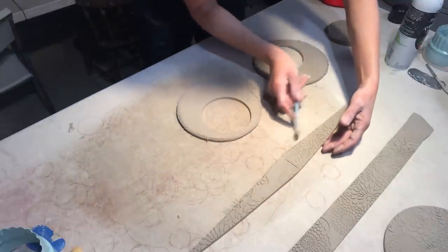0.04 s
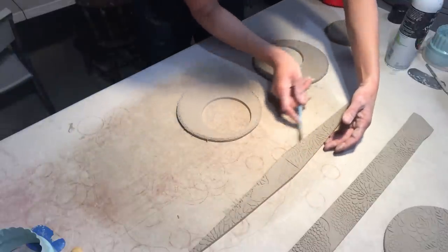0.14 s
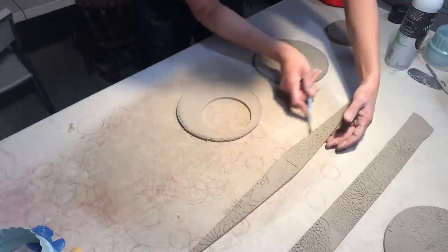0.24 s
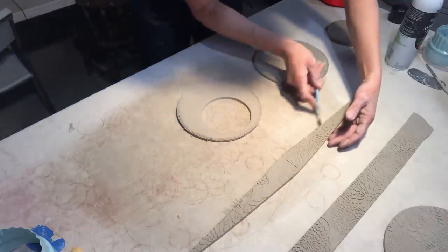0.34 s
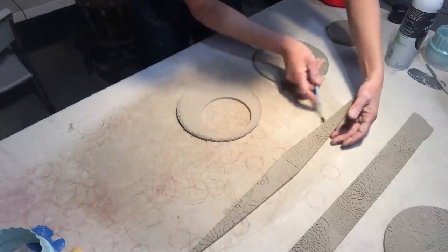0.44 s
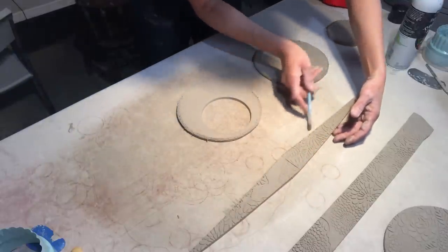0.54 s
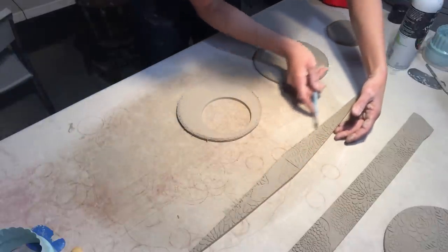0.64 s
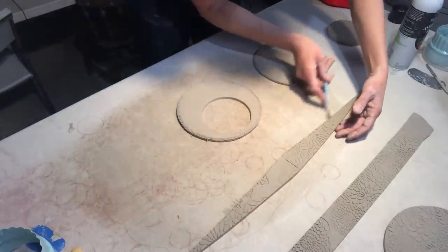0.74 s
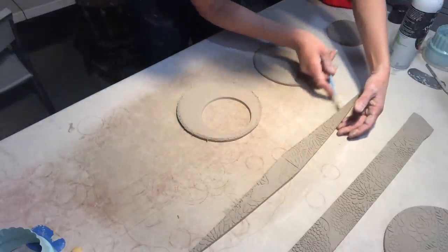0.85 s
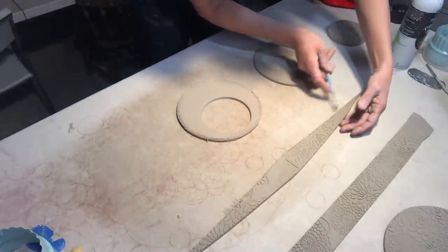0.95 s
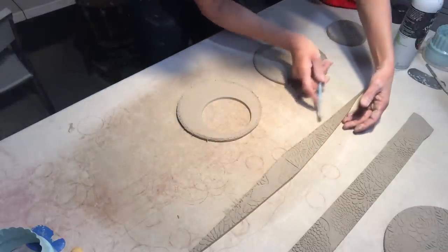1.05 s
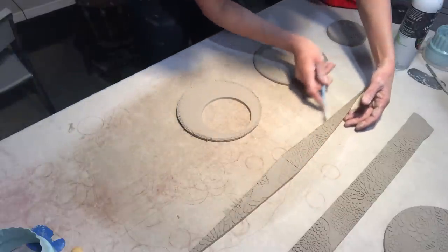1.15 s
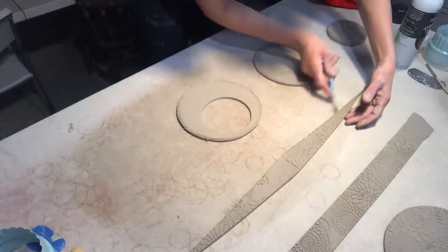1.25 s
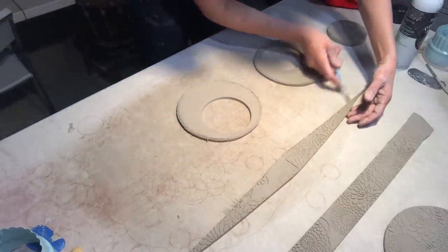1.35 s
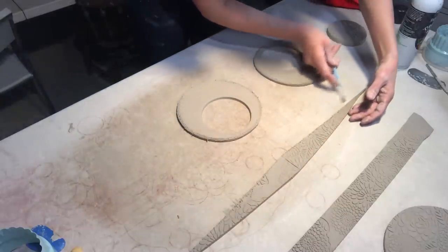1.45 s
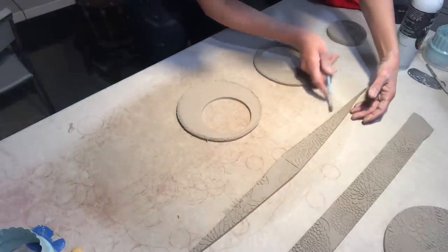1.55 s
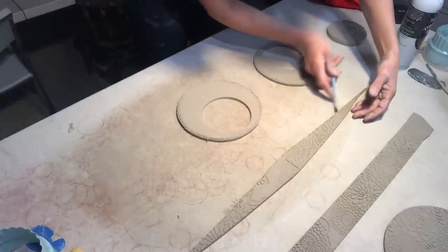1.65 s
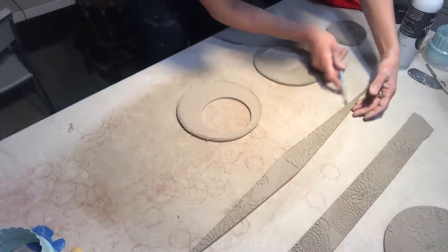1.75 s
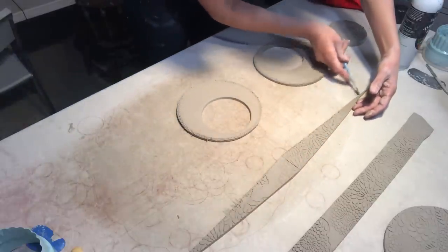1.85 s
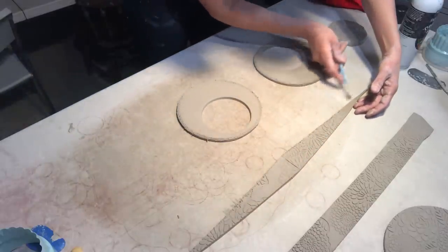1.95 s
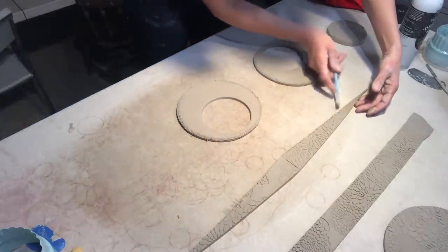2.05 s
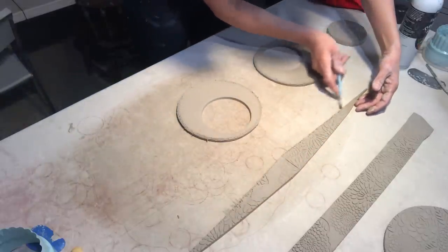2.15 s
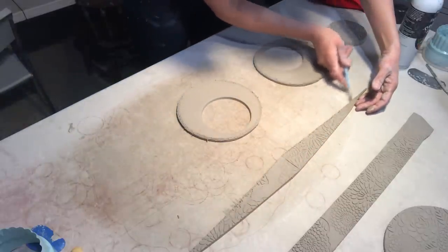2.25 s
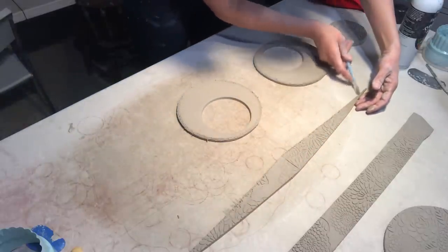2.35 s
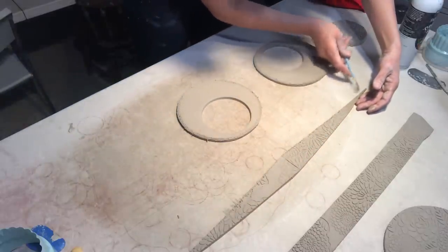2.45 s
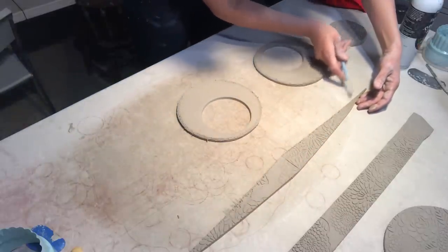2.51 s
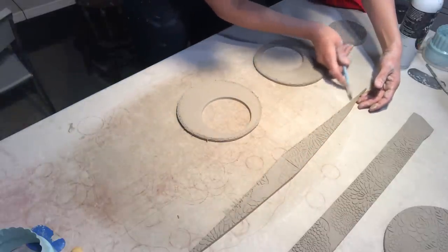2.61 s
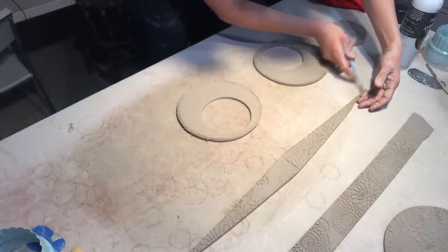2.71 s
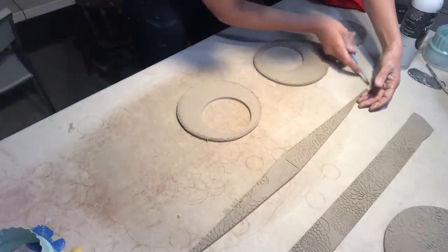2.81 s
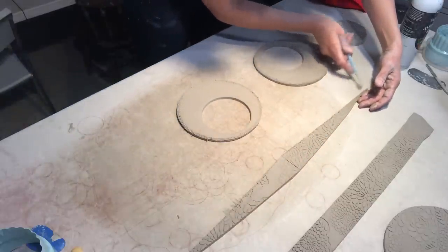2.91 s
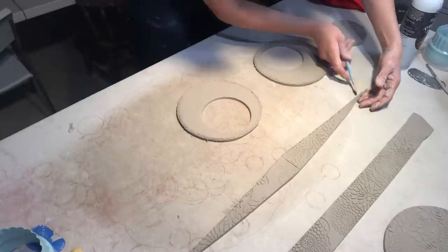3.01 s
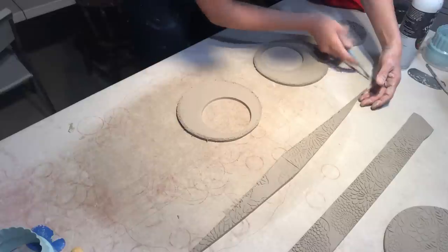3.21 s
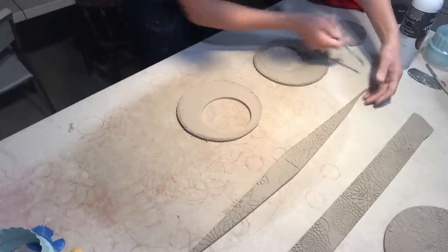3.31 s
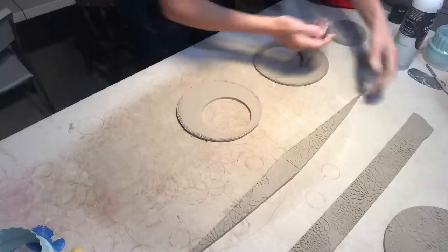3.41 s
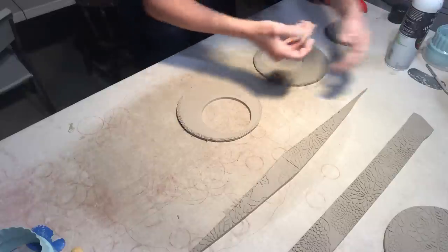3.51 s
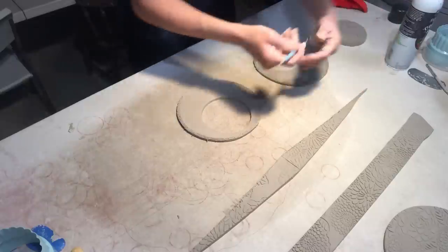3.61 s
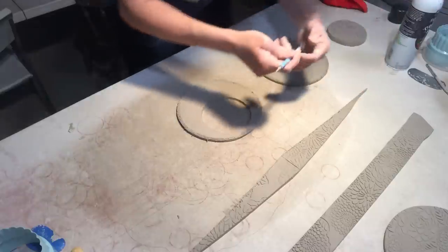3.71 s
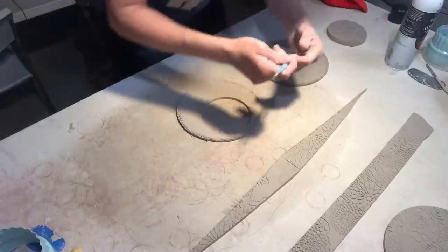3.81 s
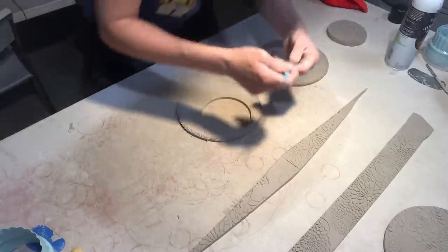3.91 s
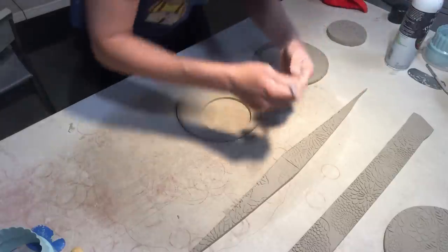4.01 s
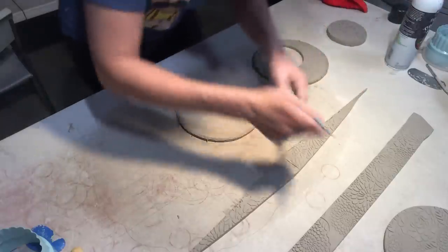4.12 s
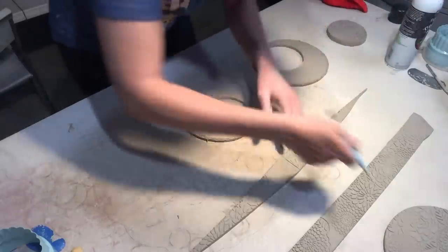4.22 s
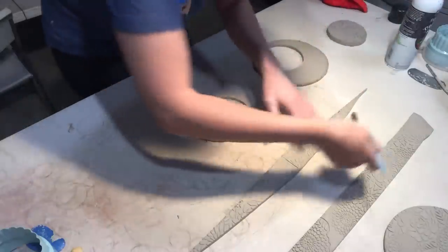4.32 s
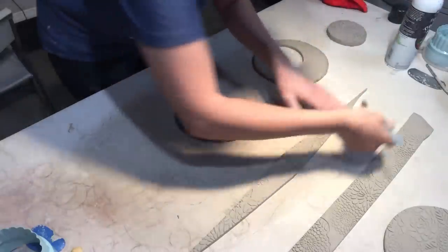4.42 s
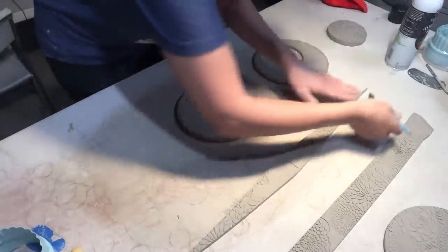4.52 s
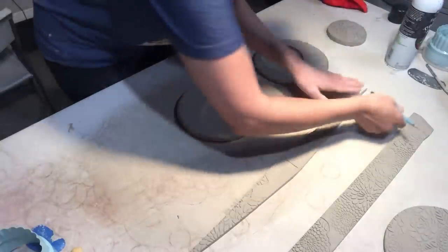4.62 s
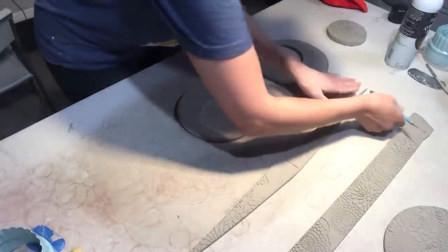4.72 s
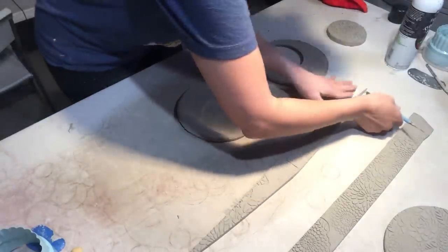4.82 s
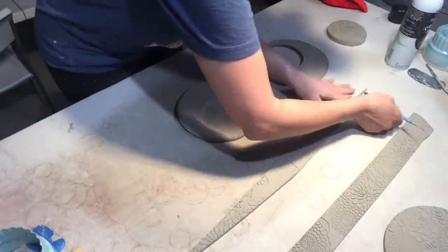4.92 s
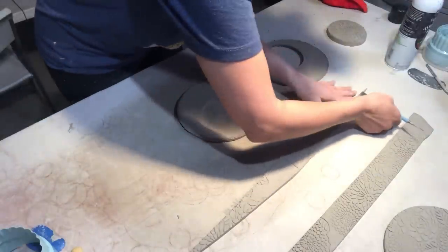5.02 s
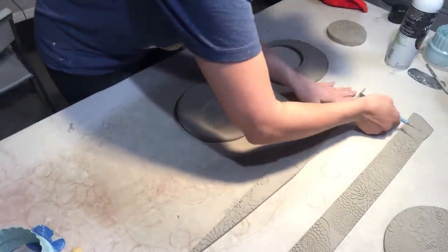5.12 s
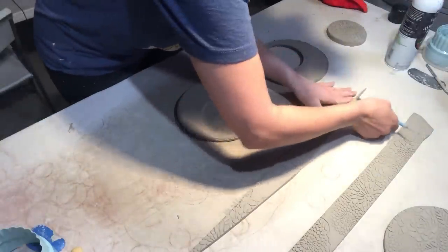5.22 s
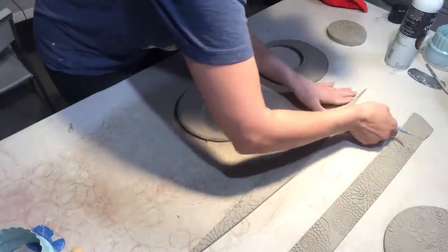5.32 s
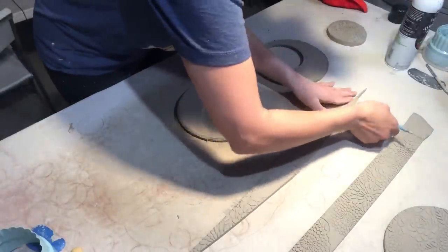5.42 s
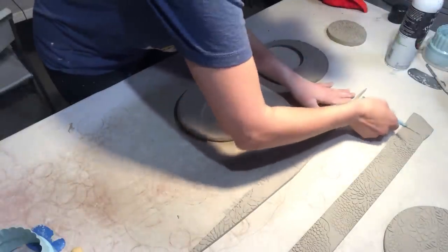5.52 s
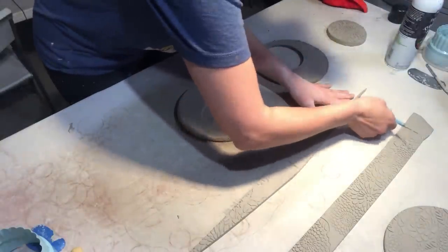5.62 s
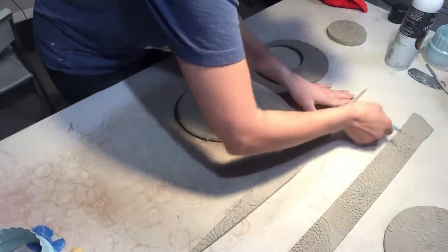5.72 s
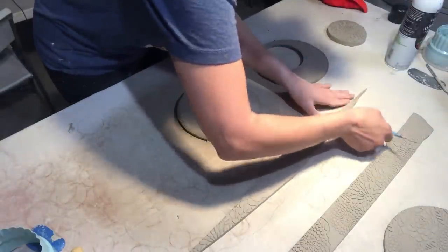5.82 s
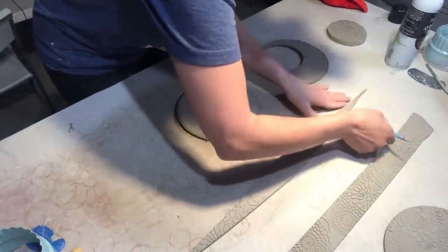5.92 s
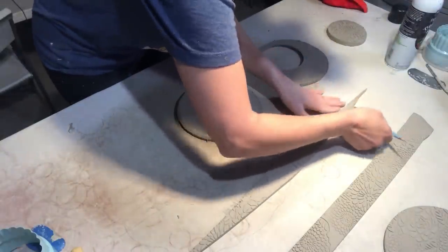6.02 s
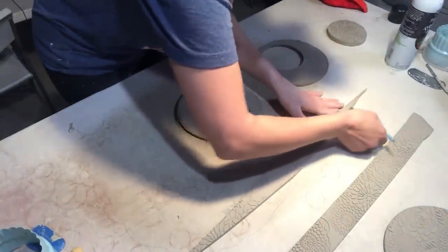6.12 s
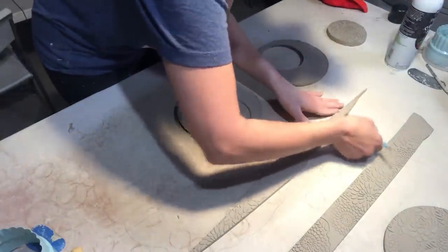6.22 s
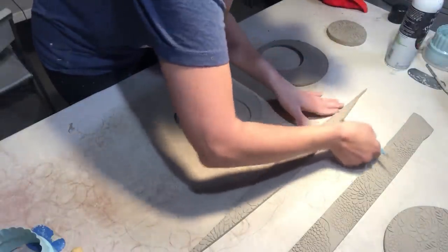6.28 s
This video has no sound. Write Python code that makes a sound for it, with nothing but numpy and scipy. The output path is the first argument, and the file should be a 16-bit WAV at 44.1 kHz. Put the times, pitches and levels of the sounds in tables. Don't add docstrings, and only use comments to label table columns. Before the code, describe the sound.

A toothed metal tool scrapes gritty strokes across clay on a table, each starting with a light knock, pausing midway, then resuming.

```python
import sys
import numpy as np
from scipy import signal
from scipy.fft import rfft, irfft
from scipy.io import wavfile

SR = 44100
rng = np.random.default_rng(int(sys.argv[2]) if len(sys.argv) > 2 else 0)


def linear_from_db(decibels):
    return 10 ** (np.asarray(decibels, float) / 20)


def persist_wave(psi):
    counts = np.round(np.clip(psi, -1, 1) * 32767).astype(np.int16)
    wavfile.write(sys.argv[1], SR, np.atleast_2d(counts).T)


N = 280035


def at_hz(points, hz):
    table_hz, values = np.array(points).T
    return np.interp(np.log(hz + 1), np.log(table_hz), values)


def bumps(modes, hz):
    return sum(db / (1 + (2 * (hz - centre_hz) / width_hz) ** 2) for centre_hz, width_hz, db in modes)


def coloured(x, db_at):
    size = 8192
    hz = np.arange(size // 2 + 1) * SR / size
    cepstrum = irfft(db_at(hz) * np.log(10) / 20)
    cepstrum[1:size // 2] *= 2
    cepstrum[size // 2 + 1:] = 0
    response = irfft(np.exp(rfft(cepstrum)))
    return signal.fftconvolve(x, response)[:N]


def band(x, low_hz, high_hz):
    return signal.sosfilt(signal.butter(2, [low_hz, high_hz], "band", fs=SR, output="sos"), x)


def band_one(x, low_hz, high_hz):
    return x / np.std(band(x, low_hz, high_hz))


def drift(rate):
    step, warm_up = 40, 2000
    r = np.exp(-2 * np.pi * rate * step / SR)
    noise = rng.standard_normal(N // step + 2 + warm_up)
    slow = signal.lfilter([1], [1, -2 * r, r * r], noise)[warm_up:]
    return np.interp(np.arange(N) / step, np.arange(len(slow)), slow / np.std(slow))


def resonance(x, hz, width_hz):
    r = np.exp(-np.pi * width_hz / SR)
    push = np.array([1, 0, -1]) * (1 - r * r) / 2
    return signal.lfilter(push, [1, -2 * r * np.cos(2 * np.pi * hz / SR), r * r], x)


# (frequency [Hz], level [dB per Hz])
SLAB_COLOUR = [(100, -25), (200, -11.5), (450, -1.5), (700, -0.5), (1100, -4.5), (2000, -4.5), (4000, -4.5),
               (5500, -8.5), (7300, -20), (8300, -28), (10000, -29), (12500, -29), (14000, -23.5),
               (16000, -40)]
# (frequency [Hz], width [Hz], boost [dB])
TABLE_MODES = [(222.7, 13.3, 5), (365, 46, 5.5), (530, 38, 4), (804, 36, 7.5), (1010, 167, 6.5),
               (1280, 270, 3.5), (1517, 80, -11)]
# (frequency [Hz], width [Hz], first grip level [dB], second grip level [dB])
SHANK_MODES = [(1764, 123, -2, 4.5), (2073, 163, 3, 1.5), (2410, 225, 0, 3.5), (3136, 86, 3.5, -2.5),
               (4300, 254, -1.5, -11), (4950, 69, 2, -6), (5560, 110, -2.5, 0), (5800, 77, -17, -7),
               (6805, 87, 1, -3)]
# (frequency [Hz], width [Hz], first grip level [dB], second grip level [dB])
TOOTH_MODES = [(10400, 100, 3, 4), (13160, 80, 16, 6), (13850, 220, 6, 5), (15600, 150, -1, -2)]
# (frequency [Hz], width [Hz], first grip level [dB], second grip level [dB])
FREE_STEEL_MODES = [(8730, 66, -22.5, -23), (11150, 90, -29, -31.5)]


def drag():
    level, hiss_db, rumble_db, ring_db = hand()
    level = level * linear_from_db(2.0 * drift(50))

    def colour(hz):
        return at_hz(SLAB_COLOUR, hz) + bumps(TABLE_MODES, hz)

    rasp = band_one(coloured(slips(per_s=6000, spread_db=3.6), colour), 717, 3680)
    rumble = band(rasp, 150, 505) * linear_from_db(rumble_db + 5.5)
    patches = mottled(rasp, patchy_db=1.7)
    middle = sum(patches[:12])
    hiss = band_one(sum(patches[12:]), 11500, 15500) * linear_from_db(hiss_db - 6)
    rubbing = level * slips(per_s=7000, spread_db=3.0)
    shank = steel(rubbing * linear_from_db(-1.43), SHANK_MODES)
    free_ring = steel(rubbing * linear_from_db(ring_db + 41), FREE_STEEL_MODES)
    whistle = steel(rubbing * linear_from_db(hiss_db), TOOTH_MODES)
    return level * (rumble + linear_from_db(-0.5) * middle + hiss) + shank + free_ring + whistle


# (time of full pressure [s], length [s],
# slab and table level [dB], steel hiss relative level [dB], light-grip ring relative level [dB])
PUSHES = [(0.0, 0.0072, -58.5, -24, -35), (0.208, 0.038, -45, -18, -19), (0.276, 0.12, -44, -20.5, -31),
          (0.389, 0.068, -45.5, -24, -28), (0.705, 0.074, -40, -22, -26), (0.793, 0.031, -50.5, -21, -16),
          (0.887, 0.075, -46.5, -25, -21.5), (1.198, .11, -43, -21, -27), (1.325, 0.14, -40, -25, -24),
          (1.696, 0.05, -44, -22, -29), (1.789, 0.15, -41, -22.5, -26), (2.206, 0.098, -45.5, -26, -30),
          (2.307, 0.082, -41.5, -23, -38), (2.409, 0.073, -45, -25, -36), (2.698, .18, -43.5, -24, -28),
          (3.147, 0.063, -46, -22, -29), (5.234, 0.049, -50.5, -21, -30), (5.311, 0.056, -50, -22, -20.5),
          (5.627, 0.01, -57.5, -18, -26), (5.692, 0.031, -45.5, -21, -29), (5.758, .08, -54, -16, -19),
          (5.853, 0.057, -43.5, -17, -27), (6.154, 0.07, -55, -24, -25), (6.256, 0.07, -47, -15, -28)]


def hand():
    bite, sag, lift = 800, 1, 484
    hiss_clog, grip_ease = 20, 40
    firm_db, rumble_db, rumble_lag = -45, -3.5, 0.34
    t = np.arange(0, N + 64, 32) / SR
    s, length, db, hiss_db, ring_db = np.transpose(PUSHES)[:, :, None]
    age = t - s
    along = np.clip(age, 0, length) - length / 2
    coming_db = bite * np.maximum(-age, 0)
    going_db = lift * np.maximum(age - length, 0)
    pressure_db = db - coming_db - sag * along - going_db
    power = linear_from_db(np.maximum(2 * pressure_db, -400)) + 1e-30
    level_db = 10 * np.log10(power.sum(axis=0))
    share = power / power.sum(axis=0)
    hiss = (share * (hiss_db - hiss_clog * along)).sum(axis=0)
    ring = (share * (ring_db + grip_ease * along)).sum(axis=0)
    rumble = rumble_db + rumble_lag * np.clip(firm_db - level_db, -10, 20)
    controls = (linear_from_db(level_db), hiss, rumble, ring)
    return [np.interp(np.arange(N) / SR, t, control) for control in controls]


def slips(per_s, spread_db):
    strength_db = spread_db * np.minimum(rng.exponential(1, N), 5)
    sizes = linear_from_db(strength_db) * rng.choice([-1, 1], N)
    clicks = sizes * (rng.random(N) < per_s / SR)
    return clicks / np.std(clicks)


def mottled(x, patchy_db):
    edges_hz = 600 * 2 ** np.arange(0, 4.9, .3)
    return [band(x, low, high) * linear_from_db(patchy_db * drift(18.7)) for low, high in zip(edges_hz, edges_hz[1:])]


def steel(force, modes):
    grip_change_s = 4.0
    second = np.arange(N) / SR > grip_change_s
    ringing = 0
    for hz, width_hz, early_db, late_db in modes:
        grip_db = np.where(second, late_db, early_db) + 4.5 * drift(13.3)
        ringing = ringing + resonance(force * linear_from_db(grip_db), hz, width_hz)
    return ringing


# (time [s], peak level [dB], brightness relative level [dB], thud relative level [dB])
LANDINGS = [(0.161, -26.5, -19, -13), (0.647, -34.5, -16, -11), (1.171, -24.5, -14, -14),
            (1.652, -28.5, -12, -15), (2.173, -24.5, -14.5, -14.5), (2.659, -23, -16, -18),
            (3.094, -30.5, -13.5, -12), (3.419, -60, -20, -16), (5.064, -32.5, -29, -13),
            (5.223, -46.5, -12, -10), (5.572, -49.5, -21, -5.5), (5.596, -54, -4, -18),
            (5.633, -51.5, -13, -8), (5.774, -48, -16, -4), (6.117, -30, -15.5, -14)]
# (frequency [Hz], level [dB per Hz])
KNOCK_COLOUR = [(100, -32), (300, 2.5), (1000, -0.5), (1600, -6), (2600, -3), (4000, -6.5), (4800, -12.5),
                (5600, -11.5), (7500, -17), (8400, -24), (10000, -30), (16000, -40)]
# (frequency [Hz], width [Hz], boost [dB])
BLOW_MODES = [(2600, 700, 3), (5600, 500, 7), (7200, 900, 3)]
# (frequency [Hz], width [Hz], level [dB])
THUD_MODES = [(193.3, 54, 0.5), (321, 19, 3.5), (451, 35, -3)]


def landings():
    body, bright, thud = np.zeros((3, N))
    age = np.arange(round(.03 * SR)) / SR
    touch = (1 - np.exp(-age / 0.00041)) * np.exp(-age / 0.005)
    rebound = .5 * (age > .009) * np.exp(-np.abs(age - .009) / .003)
    shape = touch + rebound
    for s, db, bright_db, thud_db in LANDINGS:
        teeth = linear_from_db(db) * shape * np.tanh(rng.standard_normal(len(age)))
        start = round(s * SR)
        at = slice(start, start + len(age))
        body[at] = teeth
        bright[at] = teeth * linear_from_db(bright_db + 13.5)
        thud[at] = linear_from_db(db + thud_db) * shape
    force = band(body, 297, 22000) + band(bright - body, 3550, 22000)

    def colour(hz):
        return at_hz(KNOCK_COLOUR, hz) + 1.03 * bumps(TABLE_MODES, hz) + bumps(BLOW_MODES, hz) + 10

    knock = coloured(force, colour)
    boom = sum(linear_from_db(db + 21.0) * resonance(thud, hz, width_hz) for hz, width_hz, db in THUD_MODES)
    return knock + band(boom, 203, 1800) + linear_from_db(20) * steel(bright, FREE_STEEL_MODES)


# (frequency [Hz], time to fall by 60 dB [s])
ROOM_DECAY = [(150, 0.3), (500, 0.28), (2000, 0.38), (6000, 0.19), (14000, 0.099)]


def workshop(x, wet_db):
    age = np.arange(round(.6 * SR)) / SR
    edges_hz = 80 * 2. ** np.arange(9)
    tail = 0
    for low, high in zip(edges_hz, edges_hz[1:]):
        echoes = band(rng.standard_normal(len(age)), low, min(high, .45 * SR))
        tail = tail + echoes * linear_from_db(-60 * age / at_hz(ROOM_DECAY, np.sqrt(low * high)))
    tail = tail * np.clip((age - .004) / 0.0037, 0, 1)
    tail = tail / np.sqrt(np.sum(tail ** 2))
    return x + linear_from_db(wet_db) * signal.fftconvolve(x, tail)[:N]


# (frequency [Hz], level [dB per Hz])
AIR_COLOUR = [(18, -30), (30, -12), (59, -8.5), (77, -8.5), (112, -13.5), (336, -15.5), (499, -23),
              (569, -20), (2680, -31), (4300, -30.5), (4780, -30.5), (6550, -33.5), (10500, -40),
              (14800, -38), (16000, -45)]
# (frequency [Hz], rms level [dB], phase [rad])
MOTORS = [(44.72, -64.8, -1.95), (59.1, -64.5, -2.5)]


def room_tone():
    air = coloured(rng.standard_normal(N), lambda hz: at_hz(AIR_COLOUR, hz))
    air = band_one(air, 92, 15500)
    air = signal.sosfilt(signal.butter(6, 42, "high", fs=SR, output="sos"), air)
    t = np.arange(N) / SR
    hum = 0
    for hz, db, phase in MOTORS:
        strength = np.sqrt(2) * linear_from_db(db + .5 * drift(0.98))
        hum = hum + strength * np.cos(2 * np.pi * hz * t + phase + .08 * drift(0.45))
    return linear_from_db(-66 + 0.53 * drift(3.3)) * air + hum


def scene():
    tool = linear_from_db(1.5) * drag() + landings()
    return (workshop(tool, wet_db=-9) + room_tone())[None]


def top_cut(x):
    return signal.sosfilt(signal.butter(12, 16480, fs=SR, output="sos"), x)


# (frequency [Hz], width [Hz], level [dB])
PORT_DIPS = [(4806, 710, -4), (10160, 560, -2)]


def record(dry):
    mix = coloured(dry[0], lambda hz: bumps(PORT_DIPS, hz))[None]
    mix = signal.sosfilt(signal.ellip(10, .3, 45, 15740, fs=SR, output="sos"), mix)
    return top_cut(mix)


dry = scene()
out = record(dry)
persist_wave(out)
```